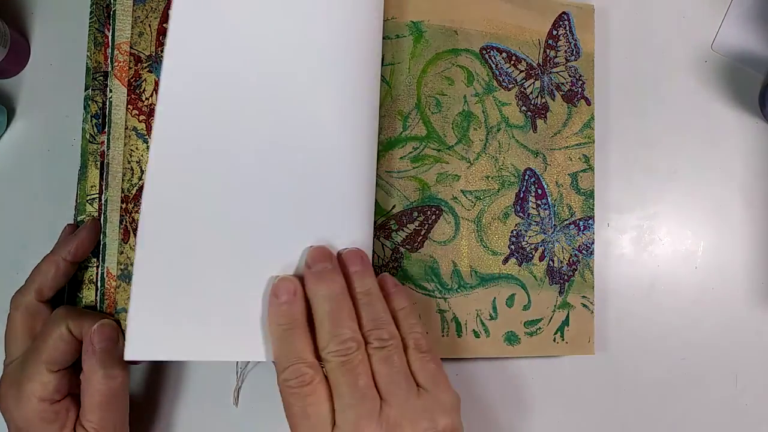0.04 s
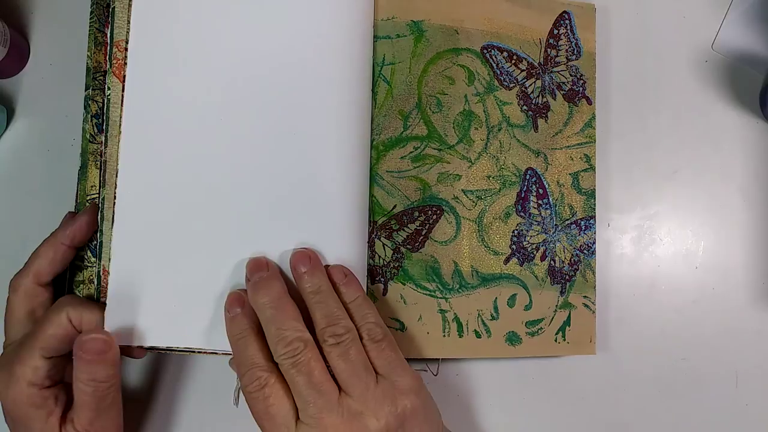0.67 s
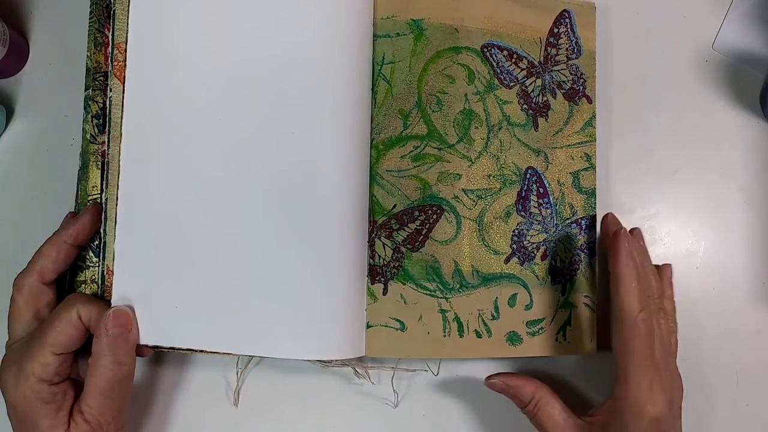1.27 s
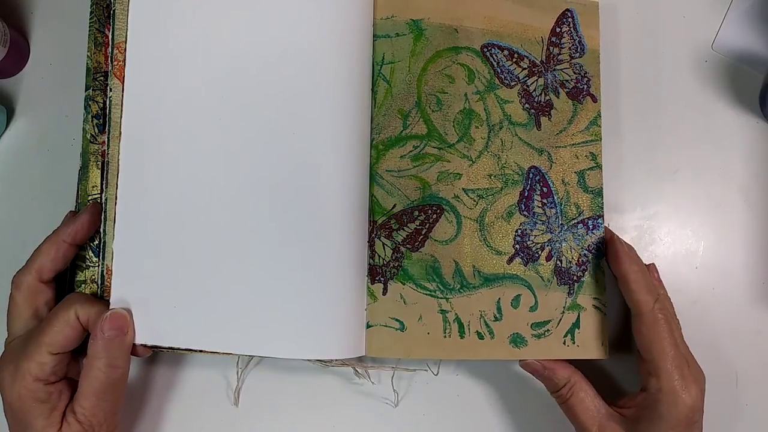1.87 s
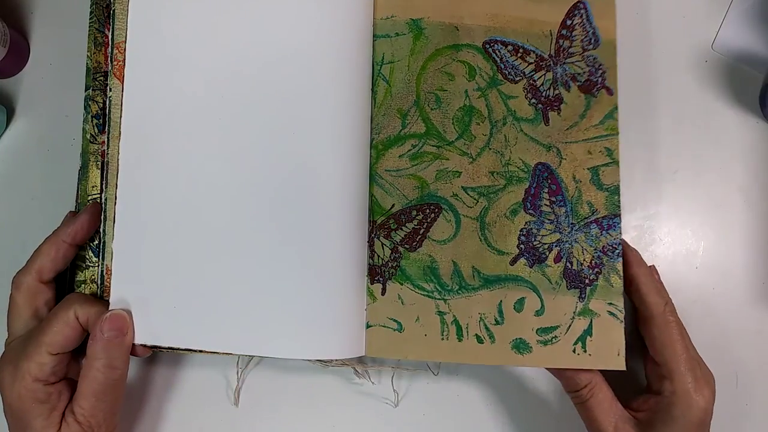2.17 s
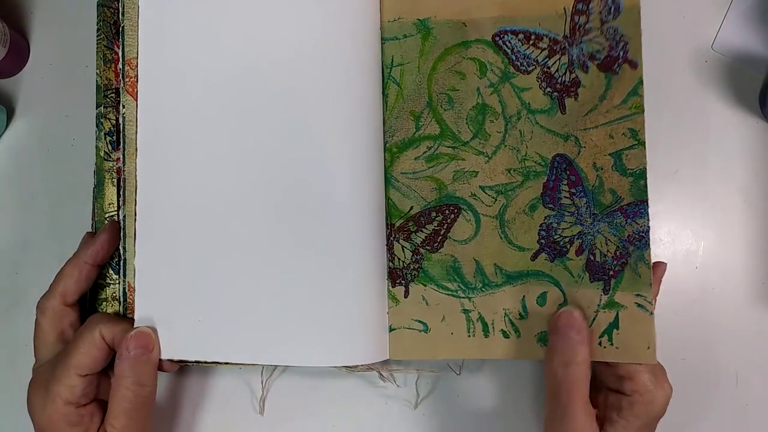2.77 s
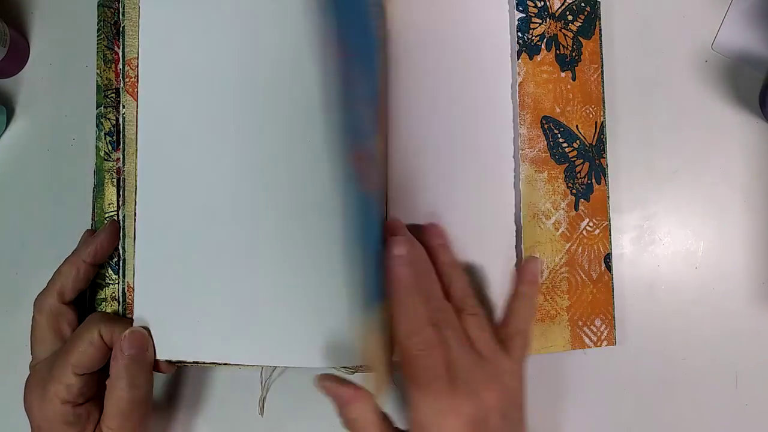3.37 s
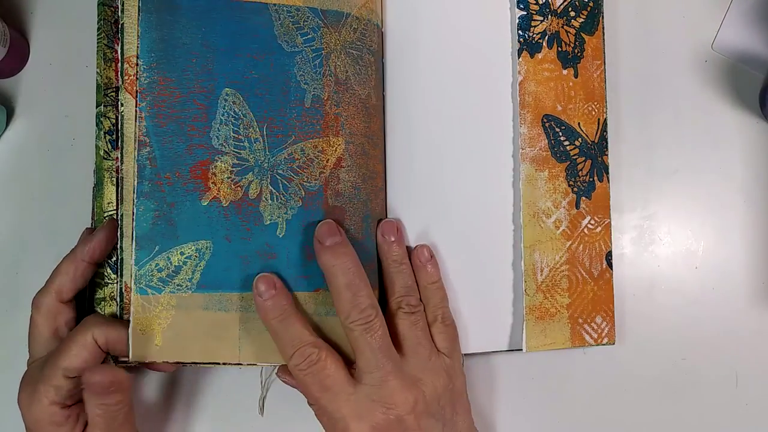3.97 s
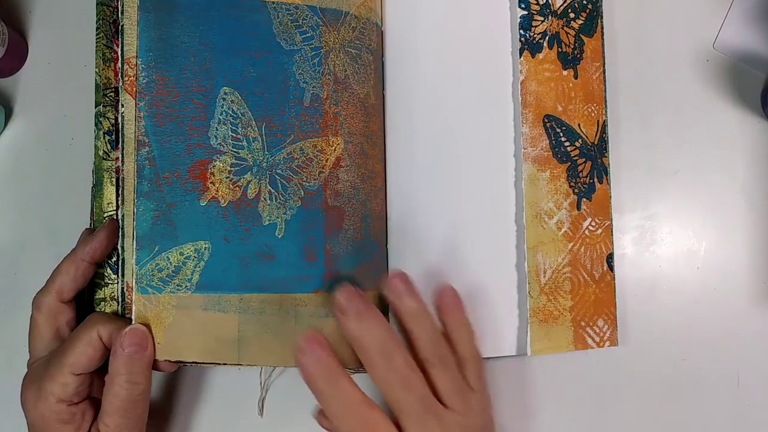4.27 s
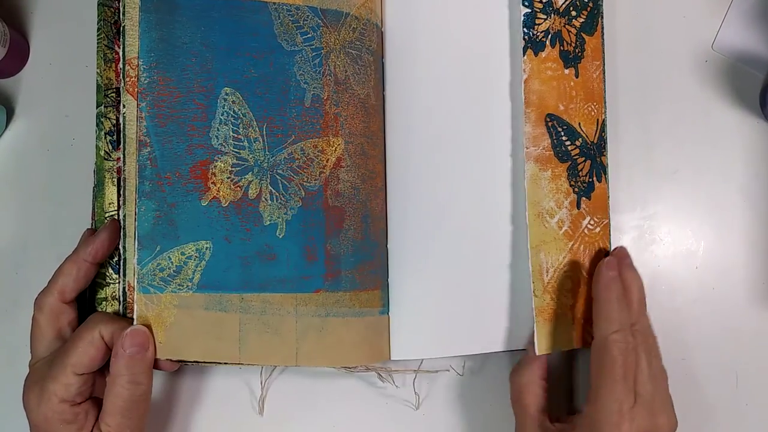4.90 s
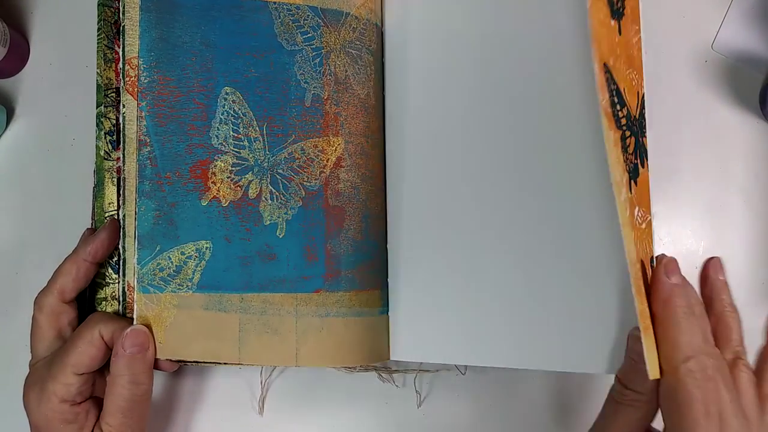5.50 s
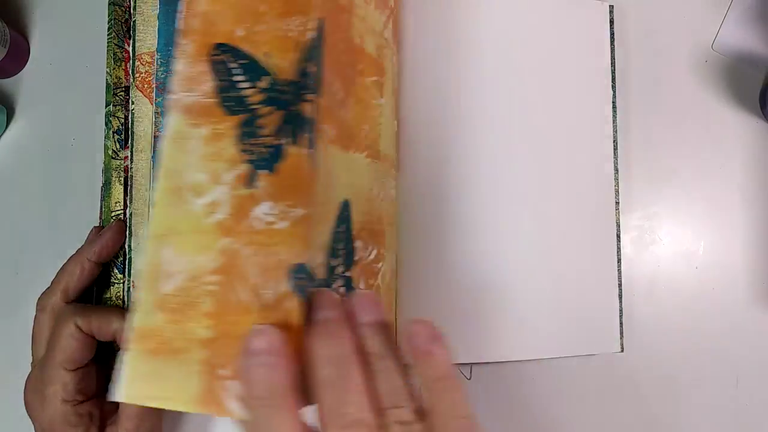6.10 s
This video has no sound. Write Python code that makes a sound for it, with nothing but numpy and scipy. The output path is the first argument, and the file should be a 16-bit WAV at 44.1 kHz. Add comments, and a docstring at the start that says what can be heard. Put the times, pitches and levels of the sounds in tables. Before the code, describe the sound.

Right at the start, a stiff journal page gives a brief high squeak and a sharp scrape as it slips free, the loudest sound, over by about 0.25 seconds. Soft rubbing and small paper ticks follow until about 1.2 seconds, then it goes nearly quiet. From 2 to 2.4 seconds a finger rasps along the edges of the stacked pages. Between about 2.5 and 4 seconds a thick page is lifted and swept over, rustling, with soft buckles and flops near 2.85, 3.5 and 3.7 seconds. Faint brushing and a few light ticks follow. A second page begins to slide around 5.4 seconds and swishes over from about 5.9 to 6.2 seconds. The paper is close to the microphone, on a table in a small, quiet room, with a faint ventilation hum and hiss behind it throughout.

```python
"""Thick painted journal pages, handled on a table close to one microphone in a small, quiet room.
A leaf squeaks and scrapes out from under its neighbour as it sticks and slips, a finger runs down
the fore-edge and rings the stack, and two pages are lifted and swept over. Their rustle is the
friction of fibres; their stiff paper buckles and flops. Farther off, the ventilation hums."""
import sys
import numpy as np
from scipy import signal
from scipy.fft import rfft, irfft, next_fast_len
from scipy.io import wavfile

SR = 44100
rng = np.random.default_rng(int(sys.argv[2]) if len(sys.argv) > 2 else 0)


def master(y):
    """Save y as 16-bit WAV."""
    cut = np.clip(np.atleast_2d(y).T, -1, 1)
    pcm = np.round(cut * 32767)  # scale
    wavfile.write(sys.argv[1], SR, pcm.astype(np.int16))


N = 275625


def from_db(db):
    return 10 ** (np.asarray(db) / 20)


def unit_rms(x):
    return x / np.sqrt(np.mean(x ** 2) + 1e-20)


def in_time(rows):
    """The columns of a curve table at every sample."""
    time_s, *columns = np.transpose(rows)
    return [np.interp(np.arange(N) / SR, time_s, column) for column in columns]


def band(x, low_hz, high_hz, order=2):
    """Causal band-pass."""
    low = np.clip(low_hz, 20, 14000)
    high = np.clip(high_hz, 1.05 * low, 19000)
    return signal.sosfilt(signal.butter(order, [low, high], "band", fs=SR, output="sos"), x + 1e-18)


def coloured(x, spectrum):
    """Give a steady signal a spectrum; rms 1."""
    hz, db = np.transpose(spectrum)
    size = next_fast_len(N)
    bins_hz = np.maximum(np.fft.rfftfreq(size, 1 / SR), 1)
    gain = from_db(np.interp(np.log(bins_hz), np.log(hz), db))
    return unit_rms(irfft(rfft(x, size) * gain, size)[:N])


def resonance(x, hz, width_hz):
    """Two-pole resonance with gain 1 at its peak."""
    r = np.exp(-np.pi * width_hz / SR)
    poles = [1, -2 * r * np.cos(2 * np.pi * hz / SR), r * r]
    return signal.lfilter(np.array([1, 0, -1]) * (1 - r * r) / 2, poles, x)


def shaped(x, bumps):
    """A chain of damped resonances and anti-resonances."""
    for hz, width_hz, db in bumps:
        height, damping = from_db(db / 2), np.pi * width_hz / SR
        turn = -2 * np.cos(2 * np.pi * hz / SR)
        zeros = [1 + damping * height, turn, 1 - damping * height]
        poles = [1 + damping / height, turn, 1 - damping / height]
        x = signal.lfilter(zeros, poles, x + 1e-18)
    return x


def drift(turns_per_s):
    """Random wandering; rms 1."""
    knots = rng.standard_normal(N)
    return unit_rms(np.interp(np.arange(N) * min(turns_per_s / SR, 1), np.arange(N), knots))


def swells(crest_s, rise_s, fall_s, db, shape=1.54):
    """Gain of movements that swell and fade, adding in power; shape 1 is peaked, 2 a round bell."""
    t = np.arange(0, N + 40, 40) / SR
    late_s = t[:, None] - crest_s
    away = np.abs(late_s / np.where(late_s < 0, rise_s, fall_s))
    power = np.sum((from_db(db) * np.exp(-away ** shape)) ** 2, axis=1)
    return np.interp(np.arange(N) / SR, t, np.sqrt(power))


def friction(slips_per_s, spread_db, clump_db, clumps_per_s):
    """Fibres catch and let go: tiny clicks of uneven size that come in clumps."""
    slips = (rng.random(N) < slips_per_s / SR) * rng.choice([-1, 1], N)
    sizes = from_db(spread_db * np.minimum(rng.exponential(1, N), 4))
    return unit_rms(slips * sizes * from_db(clump_db * drift(clumps_per_s)))


# Tones of the fan motor: pitch_hz, level_db
MOTOR_TONES = [(59.2, -66.5), (177.6, -65)]
# Spectra of the duct rumble and of the room tone: frequency_hz, gain_db
DUCT_SPECTRUM = [(25, -33), (45, -15), (60, -19), (80, -6.5), (110, -3), (150, 2.5), (190, -0.5),
                 (220, -12), (300, -21.5), (500, -41)]
ROOM_TONE_SPECTRUM = [(40, -32), (150, -4.5), (280, -5.5), (500, -8), (800, -11), (1000, -13.5),
                      (1700, -16), (4200, -23.5), (6500, -25.5), (8500, -34), (12000, -37.5), (15800, -39)]


def ventilation(rumble_db=-55.5, hiss_db=-58):
    """Well behind the table: motor hum, duct rumble and a soft, even hiss."""
    t = np.arange(N) / SR
    hum = sum(from_db(db) * np.sqrt(2) * np.sin(2 * np.pi * hz * t + 0.23 * drift(2.9))
              for hz, db in MOTOR_TONES)
    rumble = from_db(rumble_db) * coloured(rng.standard_normal(N), DUCT_SPECTRUM)
    hiss = from_db(hiss_db) * coloured(rng.standard_normal(N), ROOM_TONE_SPECTRUM)
    return hum + rumble + hiss


def room(x, level_db=-23, low_t60_s=0.66, treble_t60_s=0.39):
    """The small room answers with a short diffuse tail whose treble dies sooner."""
    t = np.arange(SR // 2) / SR
    low = band(rng.standard_normal(len(t)), 130, 1440) * from_db(-60 * t / low_t60_s)
    treble = band(rng.standard_normal(len(t)), 2700, 6800) * from_db(-60 * t / treble_t60_s)
    tail = (low + 0.95 * treble) * np.clip(t / 0.0009, 0, 1)
    return from_db(level_db) * signal.fftconvolve(x, tail / np.linalg.norm(tail))[:N]


# Peaks and notches at the microphone: centre_hz, width_hz, gain_db
TABLE_BANDS = [(1090, 130, 2.5), (1292, 184, -18), (3730, 360, -5), (4480, 270, 1), (4890, 210, -3.5),
               (6490, 270, -2), (7360, 260, 2), (8070, 620, -2.5), (9660, 280, 4.5)]


def table_reflections(x):
    """Table and book reflect the sound at close range, cancelling some bands and lifting others."""
    return shaped(x, TABLE_BANDS)


# Faint, whistling touches: crest_s, rise_s, fall_s, level_db, centre_hz, width_hz
LIGHT_SKIMS = [(.35, 0.016, 0.028, -61, 5350, 600), (.6, 0.054, .09, -49.5, 5000, 1400),
               (.91, 0.027, 0.031, -60, 9000, 4500), (3.14, 0.051, .07, -54, 5550, 520),
               (3.39, 0.1, .06, -52, 4320, 450), (3.726, 0.016, 0.048, -48.5, 4800, 900),
               (3.87, .07, 0.044, -55.5, 4800, 850), (4.22, 0.028, .016, -49, 725, 180),
               (4.87, 0.096, .04, -60, 7000, 800), (5.1, 0.22, .08, -65, 4200, 500),
               (5.545, 0.07, 0.052, -53, 2970, 600), (5.55, 0.043, 0.031, -50.5, 5230, 330)]


def skims():
    """Skin or a page corner skims the paper; each touch swells and fades in a band of its own."""
    grain = friction(slips_per_s=18000, spread_db=6.0, clump_db=2.5, clumps_per_s=120)
    return sum(swells(crest, rise, fall, db) * unit_rms(band(grain, hz - width / 2, hz + width / 2))
               for crest, rise, fall, db, hz, width in LIGHT_SKIMS)


# Spectrum of rubbed paper, shared with the turning pages: frequency_hz, gain_db
RUB_SPECTRUM = [(120, -39), (200, -1), (211, -1), (430, -16), (665, -8), (1050, -5), (1280, -5), (2850, -4),
                (3550, -4.5), (5590, -7), (7350, -8.5), (8200, -14.5), (9660, -13.5), (12200, -23.5),
                (15500, -26)]
# Resonances of the stack of leaves: pitch_hz, width_hz, gain_db
STACK_MODES = [(440, 41, -10), (957, 56, 6.5), (2240, 200, -6.5), (2480, 96, -1), (3027, 103, -3),
               (3940, 130, -1.5), (5100, 370, -10.5), (5540, 120, -2.5), (7070, 550, -12.5),
               (9700, 900, -16.5)]
# Short pushes of the finger: crest_s, rise_s, fall_s, level_db, brightness_db
FINGER_PUSHES = [(1.72, .17, 0.33, -66, 2), (2.07, .11, 0.044, -52.5, -8.5),
                 (2.126, 0.036, 0.033, -43.5, -4.5), (2.213, 0.048, 0.024, -46.5, -0.5),
                 (2.245, 0.018, .008, -49, -3), (2.3, 0.01, 0.034, -46.5, 4.5),
                 (2.333, 0.018, .025, -37.5, -0.5), (2.373, 0.027, 0.0073, -43, -6),
                 (4.72, 0.052, 0.077, -60.5, 3), (4.9, 0.096, 0.084, -57, 6), (5.11, 0.14, 0.14, -60.5, 2)]


def finger_on_edge(plain_rub_db=-7.5):
    """Skin ridges ripple over the edges and ring the stack; each push has its own level and brightness."""
    crest, rise, fall, level_db, bright_db = np.transpose(FINGER_PUSHES)
    grain = friction(slips_per_s=6700, spread_db=3.0, clump_db=0.35, clumps_per_s=110)
    ring = sum((-1) ** k * from_db(db) * resonance(grain, hz, width)
               for k, (hz, width, db) in enumerate(STACK_MODES))
    stack = unit_rms(unit_rms(ring) + from_db(plain_rub_db) * coloured(grain, RUB_SPECTRUM))
    treble = signal.sosfiltfilt(signal.butter(2, 3500, "high", fs=SR, output="sos"), stack)
    return (swells(crest, rise, fall, level_db) * (stack - treble)
            + swells(crest, rise, fall, level_db + bright_db) * treble)


# The leaf while it still sticks: time_s, pitch_hz, level_db, pitch_jitter_share
SQUEAK_CURVE = [(0, 2720, -33.5, .02), (.016, 2700, -32, .02), (.023, 3400, -42, 0.05),
                (.033, 2950, -45, 0.086), (.043, 5600, -43, 0.13), (.057, 4800, -40.5, 0.12),
                (.075, 4800, -36, 0.19), (.095, 6400, -45, 0.15), (.11, 4900, -100, .14)]


def squeak(octave_db=-23, flutter_db=2.0):
    """Nearly regular stick and slip, rising and breaking up as the leaf gathers speed."""
    pitch_hz, level_db, jitter = in_time(SQUEAK_CURVE)
    phase = 2 * np.pi * np.cumsum(pitch_hz * (1 + jitter * drift(1800))) / SR
    tone = np.sin(phase) + from_db(octave_db) * np.sin(2 * phase)
    return from_db(level_db + flutter_db * drift(372)) * unit_rms(tone)


# A leaf dragged hard over an edge: time_s, level_db, rattle_relative_db
SCRAPE_CURVE = [(0, -40, -4), (.05, -32, 2), (.08, -42, -21), (.086, -32, 9.5), (.119, -21, 2),
                (.146, -19.5, 1.5), (.175, -23, -2), (.198, -39, -15), (.25, -81, 0)]
# Its broad spectrum: frequency_hz, gain_db
SCRAPE_SPECTRUM = [(110, -57), (200, -18.5), (260, -11.5), (500, -7), (950, -5), (1600, -3), (2700, -2),
                   (4000, -7.5), (5500, -9), (7300, -16), (8500, -19.5), (10000, -18.5), (12500, -36),
                   (15500, -39)]
# Its peaks and hollows: centre_hz, width_hz, gain_db
SCRAPED_LEAF_BANDS = [(400, 104, -11.5), (643, 70, -7), (760, 89, 1), (1510, 150, 9.5), (2100, 480, -4),
                      (2670, 250, 3.5), (3460, 580, 7.5), (5000, 1000, -2.5)]


def scrape():
    """Dense, even slips drive the whole sheet; its low rattle comes and goes with the pressure."""
    level_db, rattle_db = in_time(SCRAPE_CURVE)
    grain = friction(slips_per_s=14000, spread_db=2.1, clump_db=0.5, clumps_per_s=500)
    sheet = unit_rms(shaped(coloured(grain, SCRAPE_SPECTRUM), SCRAPED_LEAF_BANDS))
    rattle = signal.sosfiltfilt(signal.butter(2, 1900, fs=SR, output="sos"), sheet)
    sliding = np.arange(N) < SCRAPE_CURVE[-1][0] * SR
    return from_db(level_db) * (sheet + (from_db(rattle_db) - 1) * rattle) * sliding


# Stiff paper buckles, flicks and flops: start_s, level_db, low_hz, high_hz, length_s
BUCKLES = [(0.036, -31, 1800, 4230, 0.0024), (0.048, -28, 1140, 3000, 0.0019),
           (.146, -23, 600, 5000, 0.0018), (.513, -47.5, 2500, 9000, 0.015),
           (.529, -43.5, 1870, 2180, .0042), (.5295, -36.5, 3150, 4600, 0.004),
           (0.665, -37.5, 3100, 8100, .0076), (.673, -41, 490, 1110, 0.0064),
           (.766, -51.5, 5000, 11000, .0033), (0.803, -52.5, 700, 6500, 0.0038),
           (.823, -54, 6000, 12000, .002), (1.151, -46, 1500, 6800, 0.0024),
           (1.512, -59.5, 6100, 7000, 0.011), (2.284, -47, 1800, 6500, .006),
           (2.361, -43.5, 4000, 9200, .0034), (2.37, -49, 2000, 8000, .003), (2.408, -48, 2000, 6000, .004),
           (2.581, -46.5, 600, 5000, 0.0026), (2.645, -49, 3000, 7440, .0071),
           (2.809, -38, 298, 1200, 0.014), (2.8337, -34.5, 290, 880, 0.0052), (2.866, -46, 400, 1100, 0.01),
           (2.8835, -42, 330, 900, 0.0073), (2.8905, -36.5, 450, 1500, .0055),
           (3.323, -42, 500, 4800, 0.0056), (3.385, -37, 2350, 3000, 0.0019),
           (3.481, -38.5, 380, 1410, 0.0067), (3.493, -34, 350, 775, 0.0047),
           (3.519, -35.5, 400, 1290, 0.0079), (3.63, -46.5, 700, 2500, .006), (3.666, -42, 380, 796, .008),
           (3.6845, -36.5, 400, 1000, 0.0077), (3.687, -34, 1400, 2930, .005),
           (3.711, -30, 550, 3140, 0.0094), (3.729, -40.5, 420, 1000, 0.0074),
           (3.871, -50, 6000, 11000, 0.0025), (4.232, -53, 5000, 9000, .004),
           (4.897, -44, 4000, 9700, 0.012), (5.336, -58, 7100, 12000, .003)]


def buckles(crack_db=-19, tail_db=-20, tail_s=0.032, first_slip=0.19, soft_hz=9000):
    """A buckle is one sharp slip and a short run of small ones; a large fold sounds low, a corner high."""
    out, t = np.zeros(N + SR), np.arange(SR // 8) / SR
    for start_s, level_db, low_hz, high_hz, length_s in BUCKLES:
        decay = np.exp(-(t / length_s) ** 2) + from_db(tail_db) * np.exp(-t / tail_s)
        run = np.sign(rng.standard_normal(len(t))) * decay
        slips = run / np.linalg.norm(run) + first_slip * (t == 0)
        fold = unit_rms(band(slips, low_hz, high_hz))
        crack = unit_rms(band(slips, low_hz / 2, 2 * high_hz, order=1))   # a faint broad skirt
        gain = from_db(level_db) * np.sqrt(length_s / t[-1])
        at = int(start_s * SR)
        out[at:at + len(t)] += gain * (fold + from_db(crack_db) * crack)
    return band(out[:N], 93, soft_hz)   # fibrous paper damps the highest treble


def curved_leaf(x, delay_s=0.0022, sway_s=0.000397, share=0.29, sways_per_s=3.0):
    """A curved leaf mirrors its own rustle from a changing distance, so the colour ripples and shifts."""
    n = np.arange(N)
    lag_s = delay_s + sway_s * drift(sways_per_s)
    return x + share * np.interp(n - lag_s * SR, n, x)


# Peaks and hollows of the two turned leaves: centre_hz, width_hz, gain_db
FIRST_LEAF_BANDS = [(520, 120, 4), (1850, 410, -4.5), (2280, 410, 4), (2900, 420, 3), (3570, 300, -4),
                    (4300, 230, 0.5), (5560, 450, 2.5), (6340, 400, -3)]
SECOND_LEAF_BANDS = [(680, 61, 1), (900, 120, 0.5), (1500, 220, 0), (2330, 200, 3), (2640, 200, 2),
                     (2910, 170, 4.5), (3770, 100, 8), (5400, 200, 2.5)]
# The hand that holds the book never lies quite still: flex_db, rasp_db, hiss_db
RESTING_HAND = [-70, -76.5, -75]
# A palm or a sheet sweeps over paper, close to the microphone:
# crest_s, rise_s, fall_s, rasp_db, flex_relative_db, hiss_relative_db
PAGE_STROKES = [(0.194, 0.016, 0.067, -49, 5, 0), (.37, 0.041, 0.24, -65.5, 6.5, -1),
                (.52, 0.057, 0.018, -59.5, -2, 3), (.6, 0.061, 0.097, -57, 1, 2),
                (.715, 0.062, .045, -62, 8.5, 0.5), (.92, 0.044, 0.067, -65, 4, 5),
                (1.02, 0.058, 0.063, -70, 8, 3), (1.23, 0.18, 0.082, -75, -5, 10.5),
                (2.44, .04, 0.045, -54.5, -2.5, -2), (2.61, 0.12, 0.12, -61.5, 6, 4),
                (2.74, 0.11, 0.16, -57, -5, -0.5), (2.85, 0.033, .018, -54.5, 3, 0.5),
                (3.025, 0.057, 0.042, -50, 1, -4), (3.145, 0.063, 0.081, -51.5, 0, 4.5),
                (3.245, 0.054, 0.069, -50, 2, 0.5), (3.335, 0.013, 0.019, -46, 5, -2),
                (3.4, 0.059, 0.034, -47.5, 2.5, -0.5), (3.5, 0.042, 0.062, -53.5, 7.5, 1),
                (3.65, 0.089, 0.052, -51.5, -2, -4), (3.734, 0.061, .025, -50.5, 3, -1.5),
                (3.87, 0.084, 0.077, -57.5, 0.5, 2.5), (3.96, 0.048, 0.052, -60, 5, 5),
                (4.215, 0.064, 0.032, -57, 2, 3.5), (4.52, 0.37, 0.28, -77, 4, 8.5),
                (4.915, .05, 0.042, -70, 16, 9), (5.055, 0.054, .035, -66.5, 0, 6),
                (5.145, 0.036, 0.049, -59.5, -7, 3), (5.42, 0.14, 0.044, -64, 1, 2),
                (5.56, 0.066, .022, -56.5, -4, 1.5), (5.88, 0.071, 0.08, -56.5, 4.5, 0),
                (5.945, 0.021, 0.058, -48.5, 0, 6), (6.03, 0.088, 0.11, -51, 0.5, 0.5),
                (6.165, 0.084, 0.029, -46.5, 4.5, -2), (6.224, 0.017, 0.014, -48, 4.5, -6.5)]


def turning_pages(second_leaf_s=4.1):
    """Fine friction rings the leaf in hand: the flexing sheet, the rasp of its fibres and a hiss."""
    crest, rise, fall, rasp_db, flex_db, hiss_db = np.transpose(PAGE_STROKES)
    grain = friction(slips_per_s=12000, spread_db=3.0, clump_db=1.0, clumps_per_s=110)
    rustle = curved_leaf(coloured(grain, RUB_SPECTRUM))
    on_first_leaf = np.arange(N) < second_leaf_s * SR
    leaf = np.where(on_first_leaf, shaped(rustle, FIRST_LEAF_BANDS), shaped(rustle, SECOND_LEAF_BANDS))
    layers = [(rasp_db + flex_db, 260, 1180), (rasp_db, 1450, 3800), (rasp_db + hiss_db, 4000, 15500)]
    out = np.zeros(N)
    for (level_db, low_hz, high_hz), resting_db in zip(layers, RESTING_HAND):
        gain = np.hypot(swells(crest, rise, fall, level_db), from_db(resting_db))
        out += gain * unit_rms(band(leaf, low_hz, high_hz, order=4))
    return out


def scene():
    """The journal up close, the room around it and the ventilation behind, in mono."""
    paper = scrape() + turning_pages() + skims() + finger_on_edge() + buckles()
    close = table_reflections(paper) + squeak()
    return (close + room(close) + ventilation())[None]


def record(dry, cutoff_hz=15900):
    """The microphone signal, with its top cut steeply."""
    return signal.sosfilt(signal.ellip(10, 0.2, 70, cutoff_hz, fs=SR, output="sos"), dry)


dry = scene()
out = record(dry)
master(out)
```